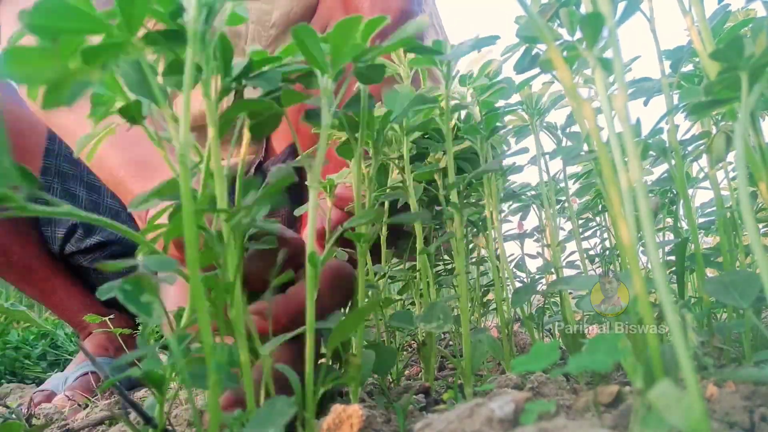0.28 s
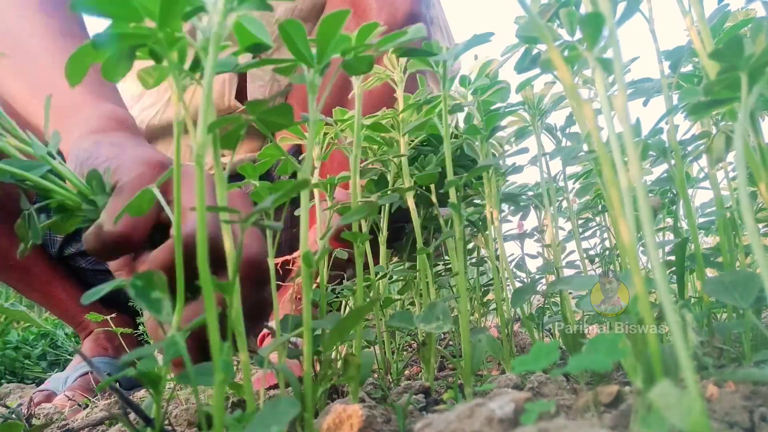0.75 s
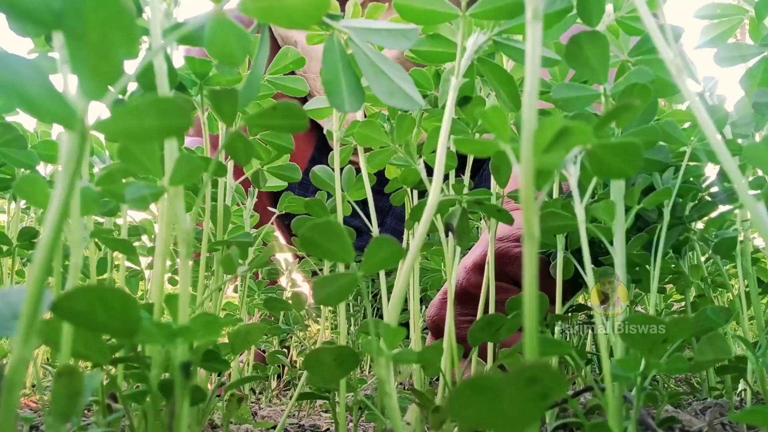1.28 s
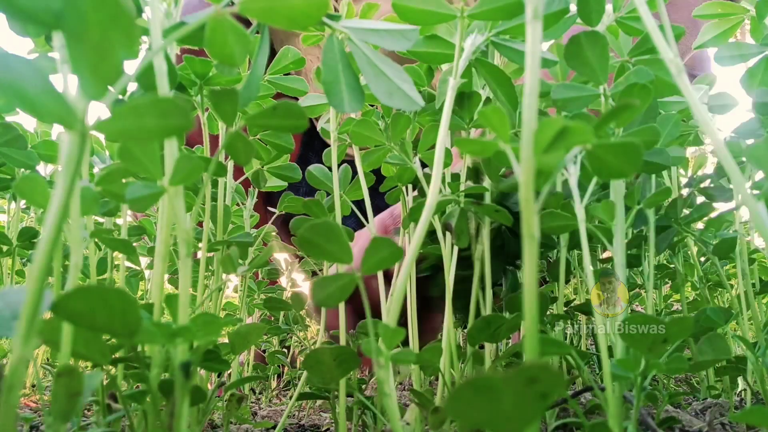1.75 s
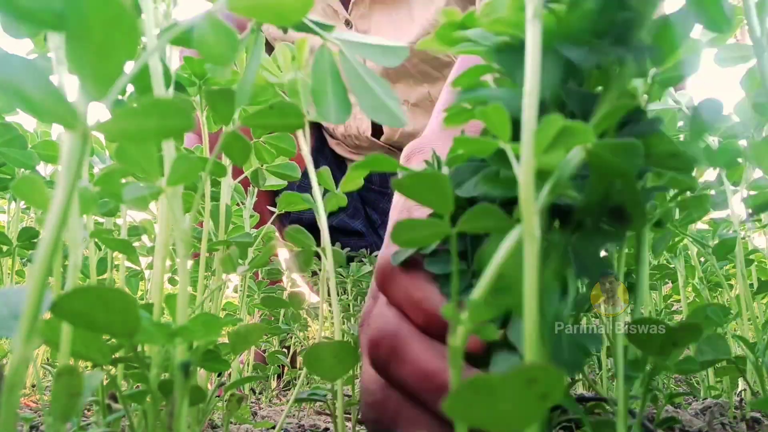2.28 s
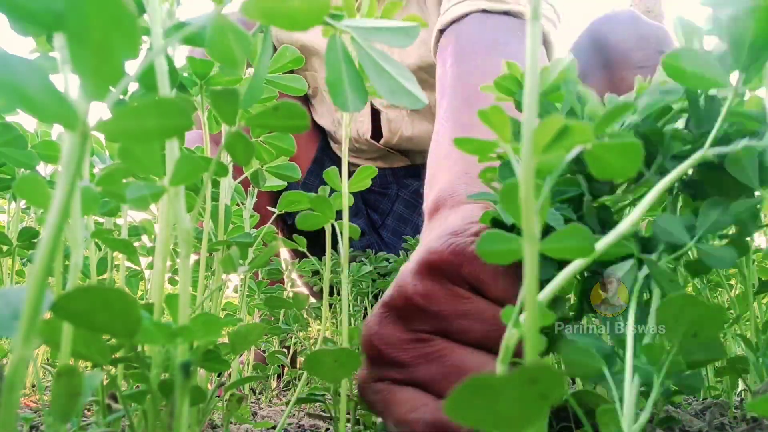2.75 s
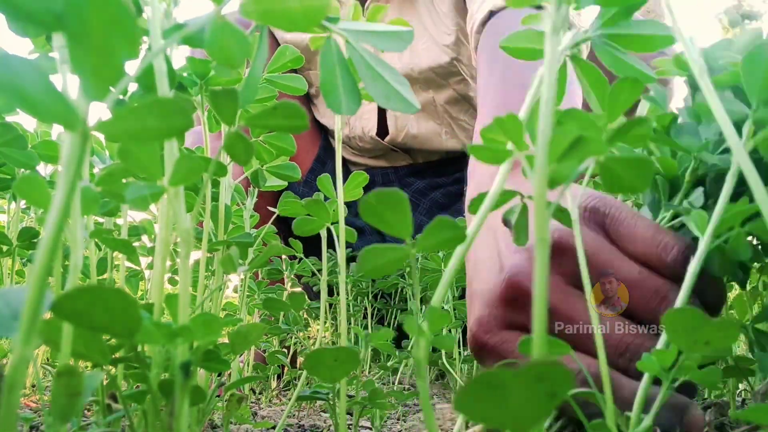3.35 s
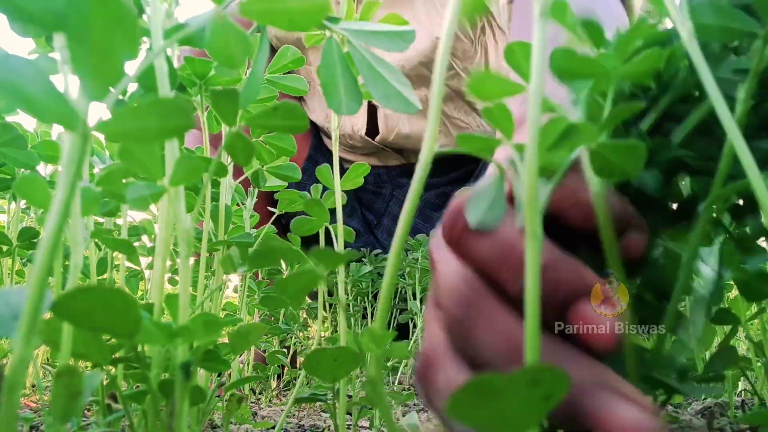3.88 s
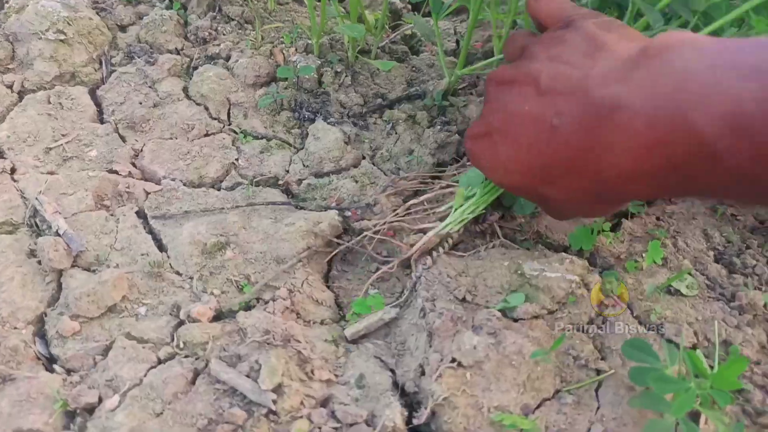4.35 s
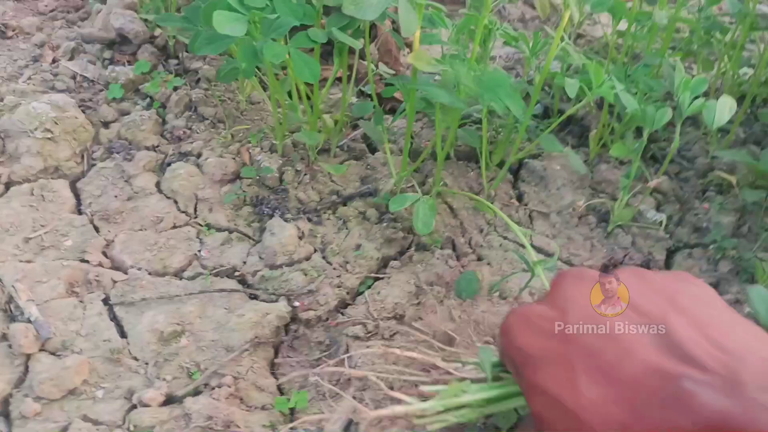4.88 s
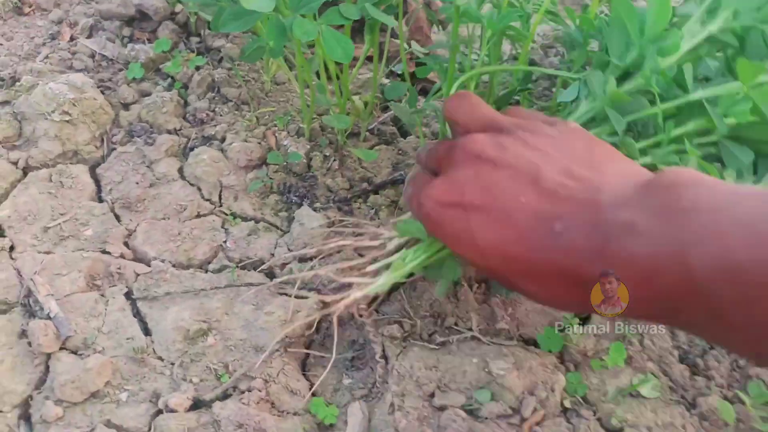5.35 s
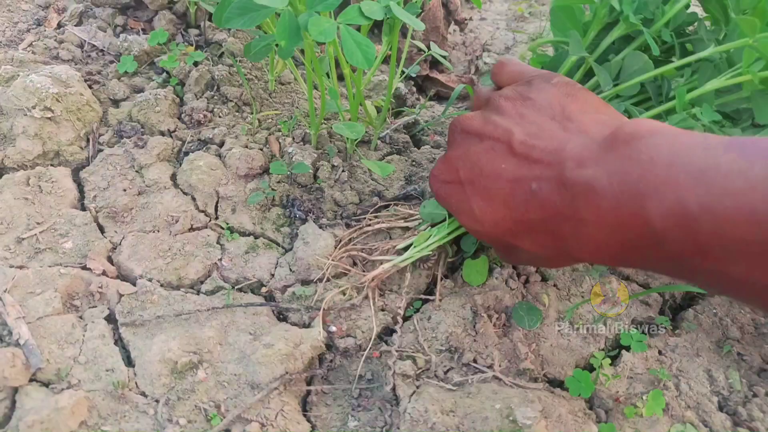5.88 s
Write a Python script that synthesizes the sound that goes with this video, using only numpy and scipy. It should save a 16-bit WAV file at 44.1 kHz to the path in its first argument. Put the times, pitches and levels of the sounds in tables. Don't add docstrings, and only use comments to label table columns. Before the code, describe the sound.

Close to the ground in an open field, a hand gathers leafy stems with a soft rustle, then yanks them out. Sharp, dry snaps come in tight volleys with tiny fibre crackles and dull soil thuds, leaning slightly left. Between pulls there are faint ticks, rubbing stems and crumbling dirt. A quiet low wind runs throughout, and small birds whistle far off toward the end.

```python
import sys
import numpy as np
from scipy import signal
from scipy.fft import rfft, irfft
from scipy.io import wavfile
from scipy.ndimage import uniform_filter1d

SR = 44100
rng = np.random.default_rng(int(sys.argv[2]) if len(sys.argv) > 2 else 0)


def int16_out(signal):
    q = np.round(np.clip(np.atleast_2d(signal).T, -1, 1) * 32767)
    wavfile.write(sys.argv[1], SR, q.astype(np.int16))


def volts(x):
    e = np.asarray(x, float) / 20
    return 10 ** e


N = 269892


def rms_one(x):
    return x / np.sqrt(np.mean(x ** 2) + 1e-20)


def peak_one(x):
    return x / (np.max(np.abs(x)) + 1e-12)


def in_time(rows):
    s, *columns = np.transpose(rows)
    return [np.interp(np.arange(N) / SR, s, c) for c in columns]


def band(x, low_hz, high_hz):
    edges_hz = [low_hz, min(high_hz, 0.45 * SR)]
    return signal.sosfilt(signal.butter(2, edges_hz, "band", fs=SR, output="sos"), x)


def colour(x, points):
    hz, db = np.transpose(points)
    axis = np.log(np.fft.rfftfreq(N, 1 / SR) + 1)
    return irfft(rfft(x) * volts(np.interp(axis, np.log(hz), db)), N)


def drift(rate_hz):
    r = np.exp(-80 * np.pi * rate_hz / SR)
    slow = signal.lfilter([1], [1, -2 * r, r * r], rng.standard_normal(N // 40 + 2002))[2000:]
    return np.interp(np.arange(N) / 40, np.arange(len(slow)), rms_one(slow))


def decay(t60_s, after_s, swell_s=np.inf, before_s=0):
    return volts(-60 * (after_s / t60_s + before_s / swell_s))


def panned(x, left_right_db):
    return x * volts(left_right_db / 2 * np.array([[1], [-1]]))


# start_s, right_late_samples, rub_db (re leaves), soil_hz,
# sheen_db
LISTENING = [
    (0, 2.9, -3, 168, 2),
    (1.4, 1.23, -7.5, 213, -0.5),
    (2.8, 2.3, -3.5, 173, 0),
    (4.1, 0.76, -5.5, 209, 0.5),
    (4.4, 1.22, 1.5, 121, 3),
    (6.12, 0.79, -1.5, 119, -1),
]


def two_ports(left, right):
    late_samples = in_time(LISTENING)[0]
    return np.array([left, np.interp(np.arange(N) - late_samples, np.arange(N), right)])


# start_s, peak_db, left_right_db, ring_hz, crack_db (re peak)
STEMS = [(0.558, -22.5, 1, 3400, -3), (0.6202, -4.5, 3.5, 2380, -2), (1.3459, -31, 2, 1340, -5),
         (1.4621, -13, 5, 5200, -12), (2.7646, -26, 12, 2600, 4), (2.8, -4, 4, 2310, 1),
         (2.8182, -5.5, 8, 2150, -14), (2.8395, -13, 1, 1960, 3), (2.852, -7, 9, 2100, -9),
         (2.9004, -2.5, 8, 4000, -6.5), (2.9222, -17, 1, 2600, -8), (3.6105, -25, 4, 1850, 4.5),
         (3.634, -9, 7, 3840, -15), (3.646, -13.5, 14, 3700, -14), (4.158, -19, 0, 4500, -3),
         (4.1734, -11, 6, 1650, -0.5), (4.224, -1, 8, 1910, -4.5), (4.2412, -13.5, 2, 4230, -4),
         (4.7729, -19, -2, 1660, -7), (4.7933, -12.5, 0, 1480, -10), (4.8135, -4, -2, 4250, -4.5),
         (4.8708, -7, -2, 4020, -10.5)]
# start_s, peak_db, left_right_db, ring_hz, crack_db (re peak)
ROOTS = [(0.0009, -24, 8, 1660, -12), (0.6144, -28, 10, 1850, -4), (1.318, -30, 2, 1300, -20),
         (1.3648, -12, -0.5, 7600, -9), (1.4238, -32.5, -1, 3080, 6.5), (1.4946, -23, 2, 2067, -7),
         (1.503, -11.5, 4, 1000, -20), (1.5071, -4.5, 4, 3670, -4.5), (1.5331, -29, 2, 1851, 9),
         (2.7941, -7.5, 2, 2870, 2), (2.8357, -34, 14, 1937, 10), (2.8622, -9.5, 8, 3320, -1),
         (2.9037, -13.5, 6, 2110, -3), (3.5795, -23, 7, 2220, -1), (3.658, -11.5, 1, 2142, -4),
         (4.0998, -30.5, -4, 1060, 1), (4.1538, -21.5, 8, 2454, 3.5), (4.215, -18, -1, 2040, -5),
         (4.2697, -24, 1, 3800, -4), (4.829, -29, 3, 1571, 0), (4.8889, -15, -5, 1500, -9),
         (6.072, -28.5, -2, 1310, -11)]
# start_s, peak_db, ring_hz, crack_db (re peak)
ROOTLETS = [(0.063, -37, 450, -6), (0.5068, -36, 4460, 4), (0.6752, -40, 2800, -6), (0.8942, -39, 4670, 5),
            (0.992, -36, 3617, -26), (1.0993, -52.5, 4170, 23.5), (1.222, -43, 4430, 11),
            (1.3996, -53, 839, 5), (1.439, -31, 4478, -10), (1.5275, -24, 7300, 0), (1.556, -41, 4600, -5),
            (1.8318, -37.5, 850, -15), (2.4087, -30, 7300, -8), (2.44, -26, 6900, -6),
            (2.458, -29, 3900, 7.5), (2.6025, -35, 3294, 8), (2.682, -37, 3400, 11), (2.714, -27, 7300, 2),
            (2.829, -28, 4440, 9), (3.487, -33.5, 2002, -6), (4.026, -47, 4349, 0),
            (4.2592, -27.5, 1900, 4), (4.6861, -39, 1870, 8.5), (4.949, -37, 1937, 13.5)]
# start_s, peak_db, crack_db (re peak)
TICKS = [(0.083, -32, -6), (0.3, -52, 16), (0.5762, -38, -4), (1.011, -31.5, 7), (1.138, -52, -7),
         (2.42, -40, 14), (2.469, -41, -4), (2.4762, -36, 6), (2.4837, -37, 12), (2.502, -37, 5),
         (2.524, -34, 5), (2.57, -54, 5), (2.5773, -50, -1), (2.7495, -46, 8), (2.758, -44, 14),
         (2.7685, -42, 11), (3.5017, -36, 2), (3.512, -33, 9), (3.5972, -33, 6), (3.6278, -34, 11),
         (3.6497, -18, -21), (3.653, -21.5, -2), (3.6733, -36, 9), (4.1893, -29, 1), (4.7658, -33, -12),
         (4.7885, -28, -12), (4.867, -39, 9), (4.887, -20.5, -7), (3.6298, -31, -8), (3.584, -34, 0),
         (4.8162, -33, 3), (4.9256, -37, -2), (0.6228, -19, -14), (2.8609, -15.5, 4), (2.8401, -13.5, 8),
         (2.9115, -36, 4), (2.92, -23, -3), (4.172, -16, -11), (4.2224, -19, 1), (5.533, -47, -12),
         (5.994, -42, -2), (1.058, -47, -6), (1.242, -39, -13), (1.5415, -35, 13), (1.55, -53, 3),
         (1.4215, -36, 0), (1.3425, -48, 14), (1.3686, -47, 11), (3.612, -40, 10), (3.6875, -37, -6),
         (3.5875, -33, -8), (4.878, -36, -8), (4.846, -40, -7), (2.8855, -42, 8), (2.8945, -40, 10),
         (2.461, -38, 8), (2.2, -39, 6), (1.5255, -41, 12), (1.5575, -41, 8), (1.5515, -42, 10),
         (0.5402, -45, 10)]


def breaks():
    stem_thud_db, root_thud_db, rootlet_thud_db, tick_thud_db = -16.5, -11, -10, -14
    rootlet_pan_db, tick_pan_db, tick_ring_hz = 4, 5.5, 3270
    return ([(s, db, pan, hz, stem_thud_db, crack) for s, db, pan, hz, crack in STEMS]
            + [(s, db, pan, hz, root_thud_db, crack) for s, db, pan, hz, crack in ROOTS]
            + [(s, db, rootlet_pan_db, hz, rootlet_thud_db, crack) for s, db, hz, crack in ROOTLETS]
            + [(s, db, tick_pan_db, tick_ring_hz, tick_thud_db, crack) for s, db, crack in TICKS])


def snaps():
    ring_cycles, swell_cycles = 9.5, 3.1
    fibre_sheen_db = -4.5
    body_pan_db, body_follows = 0.3, 0.17
    lead, soil_hz = 256, in_time(LISTENING)[2]
    t = (np.arange(2560) - lead) / SR
    after, before = np.maximum(t, 0), np.maximum(-t, 0)
    out = np.zeros((2, N + len(t)))
    for s, peak_db, pan_db, ring_hz, thud_db, crack_db in breaks():
        at = round(s * SR)
        noise, chance = rng.standard_normal((4, len(t))), rng.random(2)

        ring = -np.cos(2 * np.pi * ring_hz * t)
        ring *= decay(ring_cycles / ring_hz, after, swell_cycles / ring_hz, before)
        splinters = band(noise[0] * decay(0.02, after, 0.0065, before), 420, 6500)
        spike = np.exp(-((t - 0.0003) / 0.00025) ** 2) / 5 - np.exp(-(t / 0.00005) ** 2)
        stem = peak_one(ring + 0.9 * spike + 0.3 * peak_one(splinters))

        burst = decay(0.0031, after, 0.0014, before)
        tearing = burst + 0.12 * decay(0.022, after, 0.025, before)
        fibres = (noise[1] + 0.9 * noise[2:]) * tearing - 4.6 * (t == 0)
        sheen = volts(fibre_sheen_db) * band(fibres, 3260, 17800)
        crack = volts(crack_db + 5.0) * peak_one(band(fibres, 5400, 9250) + sheen)

        clod_hz = soil_hz[at] * (0.99 + 0.3 * chance[0])
        clod = np.sin(2 * np.pi * clod_hz * after) * decay(0.021, after)
        knock = np.sin(2 * np.pi * (300 + 200 * chance[1]) * after) * decay(0.029, after)
        crumbs = noise[0] * decay(0.034, after) * (t > 0)
        thud = volts(thud_db - 5.0) * peak_one(band(clod + 0.32 * knock + 0.5 * crumbs, 90, 1570))

        body = panned(stem + thud, body_pan_db + body_follows * pan_db)
        out[:, at:at + len(t)] += volts(peak_db) * (body + panned(crack, pan_db))
    return two_ports(*out[:, lead:lead + N])


# start_s, peak_db, pitch_hz, t60_s
CLODS = [(0.00042, -26.5, 445, 0.0264), (0.00054, -28.5, 205, 0.031), (0.6222, -23.5, 794, 0.022),
         (0.6225, -23.5, 300, 0.034), (1.5074, -17, 820, 0.014), (1.5082, -21, 384, 0.045),
         (1.5092, -26, 253, 0.048), (4.8876, -15, 1410, 0.0095), (4.8881, -20.5, 700, 0.016),
         (4.8891, -26, 137, 0.065), (4.8146, -26, 130, 0.071), (4.8716, -27, 138, 0.063),
         (2.8612, -9, 2250, 0.007), (2.8189, -17, 2000, 0.007), (3.6465, -27, 327, 0.034),
         (4.1742, -27.5, 347, 0.027), (2.9006, -15, 860, 0.0082)]


def clods():
    t, out = np.arange(4096) / SR, np.zeros((2, N))
    for s, db, hz, t60_s in CLODS:
        phase = 2 * np.pi * hz * t + np.array([[0], [0.8]])
        soft_start = np.minimum(t / 0.00092, 1)
        out[:, round(s * SR):][:, :len(t)] += volts(db - 60 * t / t60_s) * soft_start * np.sin(phase)
    return out


# strongest_s, leaf_db, swell_s, fade_s, soil_db (re leaves)
BRUSHES = [(0.299, -46, 0.083, 0.12, -0.5), (1.004, -42, 0.058, 0.064, -6),
           (1.146, -42.5, 0.062, 0.023, -5.5), (2.045, -45.5, 0.3, 0.049, -1.5),
           (2.291, -43.5, 0.24, 0.099, -4.5), (2.474, -37.5, 0.067, 0.099, -3.5),
           (2.65, -44, 0.16, 0.18, -18), (0.86, -54, 0.13, 0.27, 2.5), (3.22, -51.5, 0.22, 0.54, -6),
           (1.65, -60.5, 0.13, 0.19, 8.5), (3.879, -49, 0.17, 0.055, 1), (4.081, -51, 0.17, 0.084, -2),
           (4.6, -48.5, 0.082, 0.75, -4.5), (5.27, -52.5, 0.099, 0.057, 0), (5.601, -47, 0.21, 0.11, -2),
           (5.869, -48, 0.029, 0.05, -1.5), (6.064, -44.5, 0.047, 0.068, -3)]
# strongest_s, leaf_db, swell_s, fade_s, soil_db (re leaves)
TUGS = [(0.001, -45, .1, 0.064, 1.5), (0.55, -42.5, 0.11, 0.057, -3.5), (1.35, -47.5, 0.063, 0.036, -1),
        (1.427, -41.5, 0.031, 0.009, 2), (1.53, -32.5, 0.018, 0.035, -7.5), (2.85, -31, 0.0073, 0.022, -5),
        (2.911, -34, 0.047, 0.034, -2.5), (2.96, -45, 0.038, 0.15, -7.5), (3.5, -38.5, 0.0085, 0.036, 0),
        (3.63, -41, 0.11, 0.07, -1), (4.25, -39, 0.23, 0.037, -4.5), (4.83, -44.5, 0.031, 0.21, -5)]


def handling_db(rest_db, soil_share):
    s, db, swell_s, fade_s, soil_db = np.transpose(list(BRUSHES) + list(TUGS))[:, :, None]
    t = np.arange(0, N + 64, 64) / SR
    away = np.maximum((s - t) / swell_s, (t - s) / fade_s)
    span_db = 10
    power = np.sum(volts(db + soil_share * soil_db - span_db * away) ** 2, axis=0) + volts(rest_db) ** 2
    return np.interp(np.arange(N) / SR, t, 10 * np.log10(power))


def grains(per_s, spread_db, clump_db):
    size_db, sign = spread_db * rng.exponential(1, N), rng.choice([-1, 1], N)
    touched = rng.random(N) < per_s / SR
    loudest_db = 23
    return rms_one(sign * touched * volts(np.minimum(size_db + clump_db * drift(38), loudest_db)))


def rustle(contacts, level_db, low_hz, high_hz, scattered_db):
    scattered = np.array([grains(6000, 3, 2.5), grains(6000, 3, 2.5)])
    scattered *= volts(scattered_db + 2.0 * drift(13))
    both = two_ports(contacts, contacts) + scattered
    middle_hz, patch_db = np.sqrt(low_hz * high_hz), 2.2
    dull = volts(patch_db * drift(11)) * band(both, low_hz, middle_hz)
    bright = volts(patch_db * drift(11)) * band(both, middle_hz, high_hz)
    return volts(level_db) * rms_one(dull - bright)


def handling():
    _, rub_db, _, sheen_db = in_time(LISTENING)
    brushing = grains(1200, 11.9, 17.3)
    crumbling = grains(900, 3.3, 4.0) + 0.5 * brushing
    leaves = rustle(brushing, handling_db(-59, 0) + sheen_db + 2.5, 4120, 16900, 5.4)
    stems = rustle(brushing, handling_db(-60.5, 0.14) + rub_db - 3.0, 996, 5630, 0.98)
    soil = rustle(crumbling, handling_db(-55, 1.0) - 5.0, 120, 930, 5.2)
    return leaves + stems + soil


# freq_hz, density_db (per Hz)
WIND = [(25, -35), (45, -13), (70, -1.5), (108, 5.5), (150, -5), (260, -9.5), (500, -26.5)]
# start_s, level_db
BREEZE = [(0.0, -51.5), (0.44, -54), (1.43, -51.5), (1.81, -55.5), (2.78, -52), (3.03, -54), (3.99, -54.5),
          (4.21, -53), (5.52, -54), (6.12, -51)]


def wind():
    shared, *own = rng.standard_normal((3, N))
    level_db = in_time(BREEZE)[0] + 1.0 + 1.6 * drift(28)
    return volts(level_db) * rms_one(colour(shared + 0.59 * np.array(own), WIND))


# start_s, peak_db
GLINTS = [(0.5576, -24), (0.6204, -41), (1.099, -32), (1.345, -30), (1.365, -17), (1.5071, -34),
          (1.533, -34), (2.524, -28), (2.794, -22), (2.799, -10.5), (2.8185, -18), (2.83, -32),
          (2.861, -36), (2.9, -30), (3.634, -24.5), (4.158, -31), (4.1735, -30), (4.222, -23), (4.242, -22),
          (4.814, -40), (4.87, -24), (3.5793, -28), (3.6103, -35), (3.6578, -33), (4.83, -31),
          (4.8885, -25)]


def glints():
    t, out = np.arange(-256, 512) / SR, np.zeros((2, N))
    shape = volts(-60 * np.maximum(t / 0.0061, -t / 0.0056))
    for s, db in GLINTS:
        noise = rng.standard_normal((3, len(t)))
        puff = peak_one(band((noise[0] + noise[1:]) * shape, 12850, 16300))
        out[:, round(s * SR) - 256:][:, :len(t)] += volts(db + 6.0) * puff
    return out


def glides(rows, bend, taper):
    out = np.zeros(N)
    for s, length_s, first_hz, last_hz, db in rows:
        u = np.linspace(0, 1, round(length_s * SR))
        hz = (first_hz + (last_hz - first_hz) * u) * (1 + bend * np.sin(np.pi * u))
        tone = signal.windows.tukey(len(u), taper) * np.sin(2 * np.pi * np.cumsum(hz) / SR)
        out[round(s * SR):][:len(u)] += volts(db) * tone
    return out


# time_s, pitch_hz, level_db
PHRASES = [
    [(5.266, 2130, -64), (5.274, 1840, -53), (5.279, 1690, -46), (5.286, 1700, -45), (5.291, 2094, -50),
     (5.306, 2090, -48), (5.316, 2100, -53), (5.323, 1850, -41), (5.333, 2110, -64)],
    [(5.056, 2350, -62), (5.066, 2337, -51.5), (5.09, 2290, -48), (5.13, 2286, -53), (5.155, 2330, -45),
     (5.166, 2380, -62)],
    [(5.35, 2210, -56), (5.358, 2205, -53), (5.37, 2160, -51), (5.384, 1988, -43), (5.397, 1760, -45),
     (5.406, 1925, -48), (5.42, 1754, -52), (5.436, 1430, -57), (5.447, 1380, -64)],
    [(5.676, 4250, -74), (5.684, 4330, -57), (5.702, 4350, -62), (5.722, 4160, -60), (5.748, 3840, -59),
     (5.77, 3830, -74)],
    [(5.822, 3350, -69), (5.846, 3620, -64), (5.866, 3650, -51), (5.885, 3640, -60), (5.902, 3600, -68),
     (5.922, 3740, -60), (5.932, 3600, -72)],
    [(5.975, 3120, -74), (5.996, 3240, -61), (6.008, 3500, -65), (6.018, 3720, -59), (6.032, 3650, -72)],
    [(4.455, 1960, -67), (4.465, 1800, -60), (4.472, 2200, -64), (4.485, 2280, -59), (4.494, 2200, -65),
     (4.502, 1900, -70)],
    [(4.522, 2260, -68), (4.545, 2210, -61), (4.56, 2110, -63), (4.572, 1980, -75), (4.585, 1860, -58),
     (4.6, 1600, -68), (4.61, 1300, -70)],
]


def phrases():
    out = np.zeros(N)
    for rows in PHRASES:
        s, hz, db = np.transpose(sorted(map(tuple, rows)))
        at = np.arange(round(s[0] * SR), round(s[-1] * SR))
        hz, db = (uniform_filter1d(np.interp(at / SR, s, c), size=150, mode="nearest") for c in (hz, db))
        tone = signal.windows.tukey(len(at), 0.1) * np.sin(2 * np.pi * np.cumsum(hz) / SR)
        out[at] += np.sqrt(2) * volts(db) * tone
    return out


# start_s, length_s, first_hz, last_hz, level_db
WHISTLES = [
    (4.935, 0.038, 1930, 1920, -54),
    (4.93, 0.04, 2300, 1950, -58),
    (5.075, 0.071, 2130, 2100, -59),
    (5.395, 0.16, 3480, 2830, -62),
    (5.55, 0.055, 3300, 3700, -69),
    (5.135, 0.04, 4150, 3780, -67),
]
# start_s, length_s, first_hz, last_hz, level_db
ARCHES = [
    (4.35, 0.025, 2690, 2780, -57),
    (5.1, 0.04, 4250, 4160, -59),
]


def birds():
    out = volts(4.5) * (glides(WHISTLES, -0.018, 0.23) + glides(ARCHES, 0.037, 0.87))
    out *= volts(2 * drift(80) - 0.5)
    out += phrases() * volts(2.5 * drift(90) - 1.0)
    echo = volts(-12) * np.array([np.roll(out, 620), np.roll(out, 910)])
    return out * volts([[-1.2], [1.2]]) + echo


def scene():
    return snaps() + clods() + handling() + wind() + glints() + birds()


# freq_hz, gain_db
PORTS = [(4650, 2), (4800, -3.5), (6050, -4), (6250, 3), (7650, 5), (7800, -2.5), (8450, -1), (8700, -7.5),
         (11400, -16.5), (11650, -5.5), (13500, -3.5), (14300, -3.5), (15300, -1.5), (15700, -20),
         (16400, -26)]


def microphone(x):
    return signal.sosfilt(signal.butter(4, 52, "high", fs=SR, output="sos"), colour(x, PORTS))


# low_hz, high_hz, muted_percent
MUTED = [(4750, 5600, 12), (8700, 9400, 68), (9400, 11450, 88)]


def suppress(x):
    hz, _, cells = signal.stft(x, SR, "cosine", 2048)
    power = uniform_filter1d(np.abs(cells) ** 2, size=17, axis=1).sum(axis=0)
    level_db = uniform_filter1d(10 * np.log10(power + 1e-20), size=2, axis=1)
    level_db -= np.median(level_db, axis=1, keepdims=True)
    for low_hz, high_hz, percent in MUTED:
        zone = (hz > low_hz) & (hz < high_hz)
        standing_db = level_db[zone] - level_db[zone].mean(axis=0)
        cells[:, zone] *= standing_db > np.percentile(standing_db, percent)
    return signal.istft(cells, SR, "cosine", 2048)[1][:, :N]


def low_pass(x):
    return signal.sosfilt(signal.butter(12, 16520, fs=SR, output="sos"), x)


def record(dry):
    heard = np.clip(suppress(microphone(dry)), -1, 1)
    heard = signal.sosfilt(signal.cheby2(12, 70, 16800, fs=SR, output="sos"), heard)
    return low_pass(heard)


dry = scene()
out = record(dry)
int16_out(out)
```